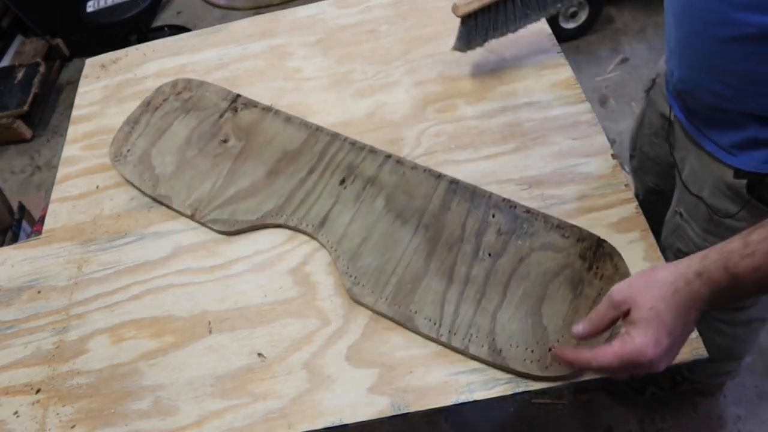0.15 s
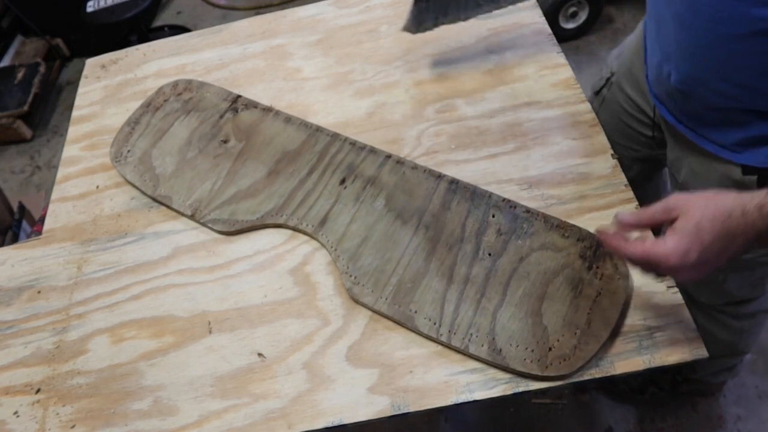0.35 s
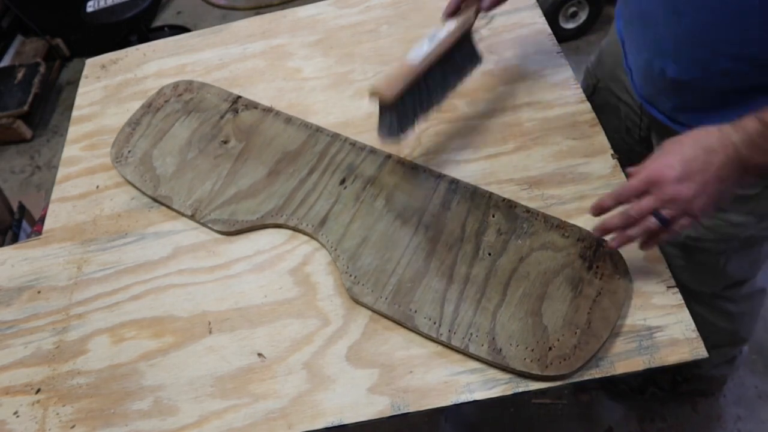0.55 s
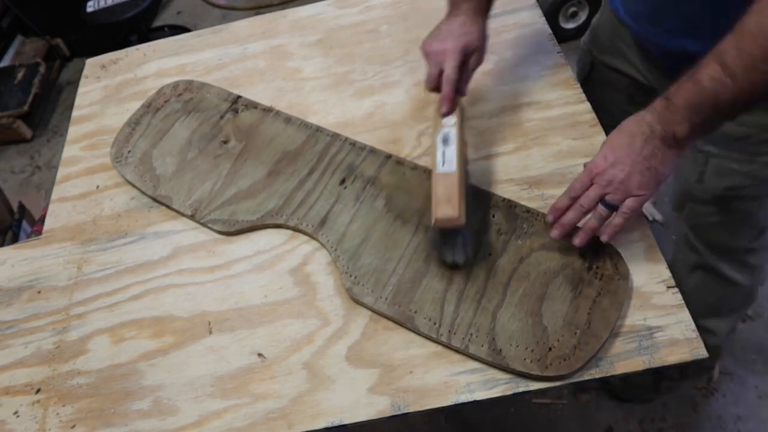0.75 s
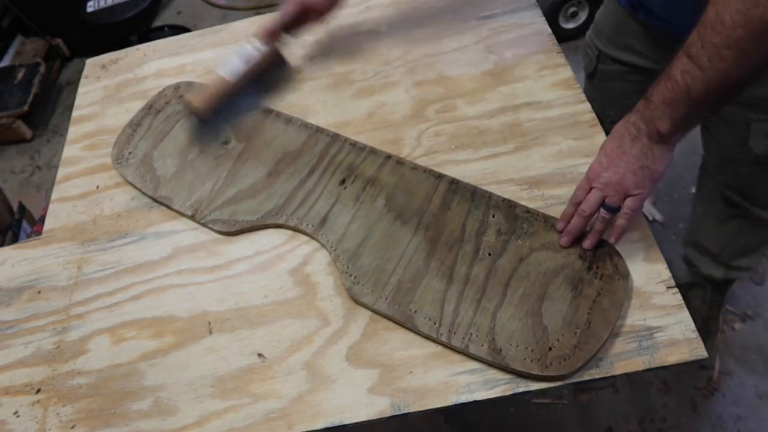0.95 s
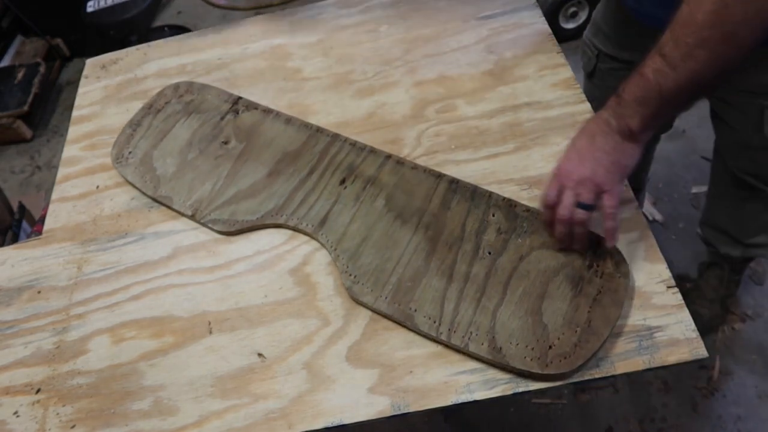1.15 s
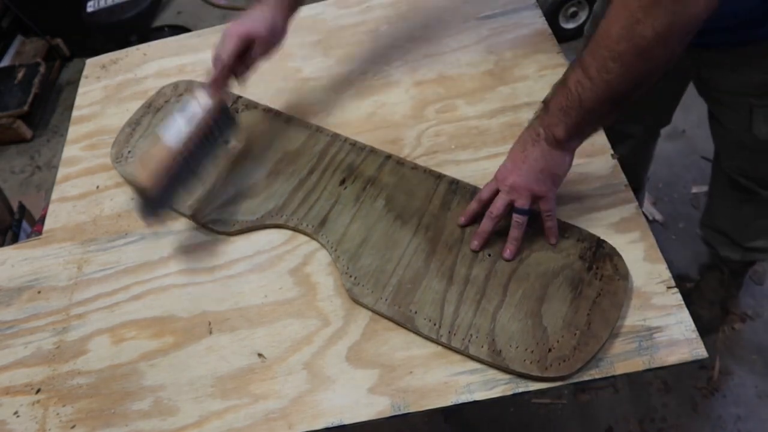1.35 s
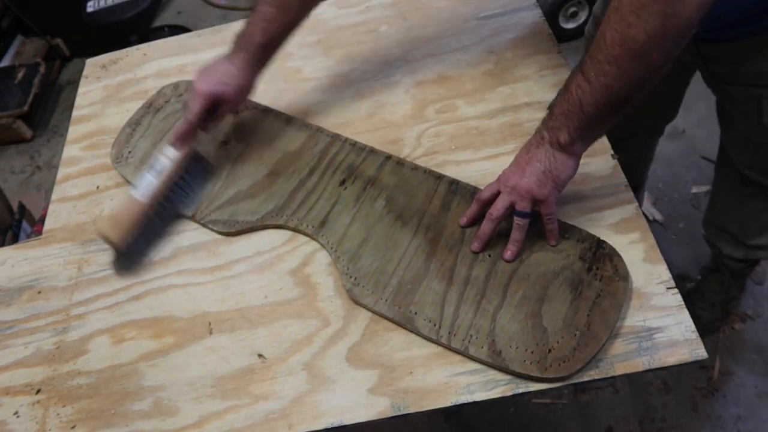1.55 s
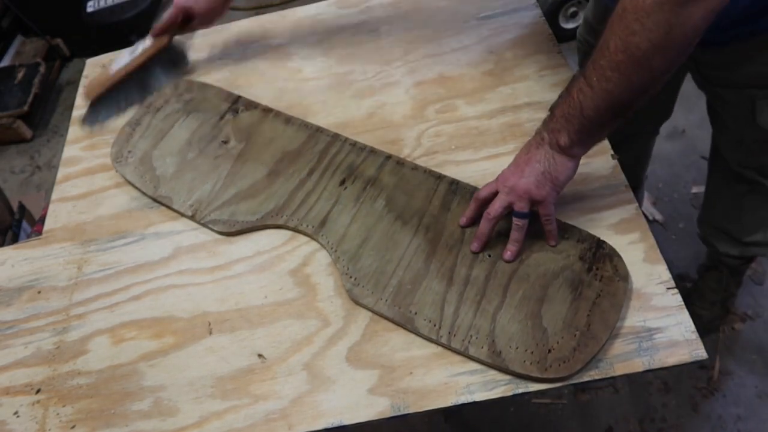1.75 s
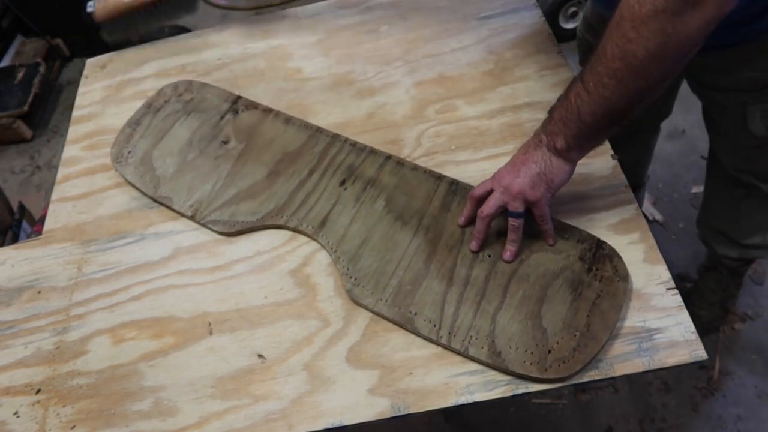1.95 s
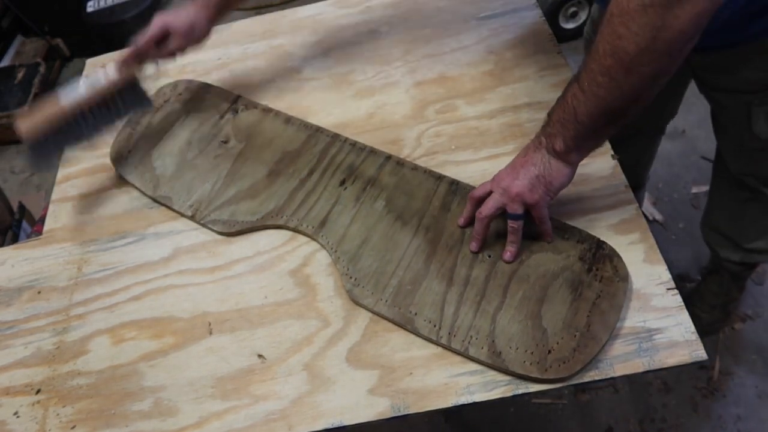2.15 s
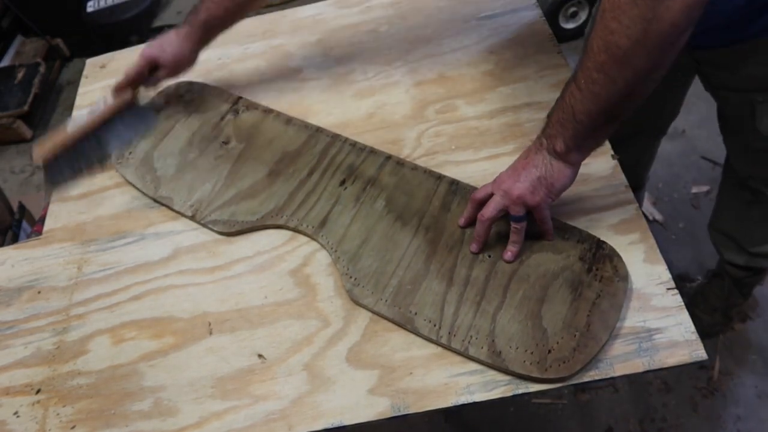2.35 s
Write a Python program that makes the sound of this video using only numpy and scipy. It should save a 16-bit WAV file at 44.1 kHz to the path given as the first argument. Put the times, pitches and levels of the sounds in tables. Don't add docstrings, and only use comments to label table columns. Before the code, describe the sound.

A stiff brush sweeps a plywood board on a wooden bench. First, at 0.2-0.5 s, the board lands with hollow knocks, a sharp crack and trembling rattle. A short bristly stroke follows at 0.6-0.75 s, then longer swishes at 0.9-1.3 and 1.7-2.1 s, with bright grit clicks near 1 s and dull wood knocks between. Close microphone, short garage reflections, faint air, hum and distant machine whirr.

```python
import sys
import numpy as np
from scipy import signal
from scipy.fft import rfft, irfft, next_fast_len
from scipy.io import wavfile
from scipy.ndimage import uniform_filter1d, map_coordinates

SR = 44100
rng = np.random.default_rng(int(sys.argv[2]) if len(sys.argv) > 2 else 0)


def generate_wav(sig):
    pcm = np.round(np.clip(np.atleast_2d(sig).T, -1, 1) * 32767).astype(np.int16)
    wavfile.write(sys.argv[1], SR, pcm)


def amplitude_ratio(level_db):
    exponent = np.asarray(level_db, float) / 20
    return 10 ** exponent


N = 105840

# f/Hz, level/dB per Hz
AIR_SPECTRUM = [(50, -4), (285, -16), (1100, -27), (2200, -30), (5200, -34.5), (8000, -38.5), (12500, -37),
                (16400, -59)]
# t/s, level/dB
AIR_LEVEL = [(0, -43.5), (.1, -50.5), (.26, -50.5), (.29, -55), (.4, -47.5), (1.6, -49.5), (2.19, -50.5),
             (2.22, -58.5), (2.26, -53), (2.4, -54.5)]
AIR_OVER_DB, HUM_HZ, HUM_WIDTH_HZ, HUM_DB = 9.5, 195, 30, -47
# f/Hz, width/Hz, level/dB
FAR_BANDS = [(770, 164, 0), (1440, 270, -1), (1950, 330, -2), (3620, 510, -6.5), (4700, 360, -6)]
# t/s, level/dB
FAR_LEVEL = [(0, -39), (.06, -42.5), (.2, -47), (.5, -54), (1.35, -59), (1.45, -50.5), (1.6, -48.5),
             (1.7, -42), (2.1, -62), (2.4, -74)]
# f/Hz, t60/s
GARAGE_DECAY = [(150, .12), (2000, .25), (12000, .12)]
GARAGE_DB = -14
# f/Hz, level/dB
SIDE_COLOUR = [(60, -45), (350, -35), (1400, -33), (2800, -36), (5500, -29.5), (10000, -26)]
DUCK_OVER_DB, DUCK_SHARE, DUCK_S = -8, 0.89, 0.018
# t/s, length/s, f/Hz, level/dB
SQUEAKS = [
    (.165, .085, 850, -33),
    (.02, .14, 12050, -60),
    (.06, .09, 10750, -59),
    (.02, .14, 13600, -66),
    (.33, .07, 11700, -60),
    (1.57, .045, 13600, -64),
]
SQUEAK_SAG, SQUEAK_ROUGH_DB = .025, 3
# t/s, peak level/dB, f/Hz
GRIT = [(0.614, -24, 9000), (0.829, -16, 10540), (0.8765, -21, 8800), (0.8987, -10.5, 8000),
        (0.9155, -9, 7000), (0.9363, 0, 10100), (0.9385, -19, 9800), (0.9505, 0.5, 10800),
        (0.958, -7, 9800), (0.963, -14, 10000), (0.9715, -1, 10000), (0.9745, -5, 10100),
        (0.978, -12, 10500), (0.9845, 5, 10200), (0.9865, 6, 10200), (0.9878, 2, 9900), (0.989, -4, 9700),
        (0.9942, -5, 10500), (1.3455, -25, 10700), (1.3593, -20, 8200), (1.3773, -27, 10780),
        (1.3955, -38, 9500), (1.4158, -14, 10800), (1.4856, -13, 8680), (1.501, -30, 10200),
        (1.525, -25, 6900), (1.534, -26, 9550), (1.56, -24, 9300), (1.5734, -33, 10000),
        (1.5918, -25, 9400), (1.6107, -30, 9550), (1.6524, -5, 8500), (1.875, -7, 7000), (2.197, -38, 6580),
        (2.2025, -34, 5500), (2.2027, -38, 9500), (2.2695, -30, 9400), (2.3245, -41, 4500),
        (2.3325, -42, 4040), (2.359, -38, 4530), (2.376, -40, 5500), (2.386, -40, 3500)]
# t/s, peak level/dB, f/Hz, t60/s
CRACKS = [(.2634, 3.5, 1760, 0.011), (.2637, -12, 4000, 0.006), (.3657, -17.5, 1690, 0.056),
          (.2535, -8.5, 1270, 0.017), (.3655, -11.5, 4670, 0.0056), (.417, -26, 3650, 0.12),
          (0.81, -13, 3600, 0.0033), (0.62, -15, 5500, 0.0046), (.9685, -8.5, 840, 0.032),
          (.9683, -10, 2150, 0.041), (.9695, -14, 4300, 0.023), (1.2172, -4, 3980, 0.025),
          (1.2175, -12.5, 1500, 0.051), (1.3593, -26, 2500, .005), (1.423, -20.5, 3300, 0.0093),
          (1.4228, -19, 1770, 0.011), (1.395, -29, 900, 0.017), (1.524, -45, 900, 0.021),
          (1.6539, -10, 2920, 0.02), (1.6535, -15.5, 1480, 0.021), (1.653, -15.5, 5600, 0.015),
          (2.2694, -25.5, 2150, 0.0062), (2.2696, -33, 3900, 0.004), (2.2025, -27, 2000, 0.0072)]
CRACK_WIDTH, GRIT_WIDTH = .45, .7
GRIT_T60 = .0035
SNAP_DB, SNAP_T60 = -3, .002
MIC_HZ = 13500
# f/Hz, level/dB
BOARD_MODES = [(62, -14), (100, -2), (168, -5), (255, -4.5), (355, 1), (500, -4), (640, -4.5), (830, -4.5),
               (1070, -9.5), (1500, -12.5)]
# t/s, level/dB
TREMBLE_LEVEL = [(0.0, -45), (0.16, -44.5), (0.27, -24), (0.39, -22), (0.47, -37), (0.58, -39), (0.75, -42),
                 (0.84, -40), (1.02, -49), (1.28, -39.5), (1.43, -44), (1.61, -52), (1.68, -28.5),
                 (2.03, -33.5), (2.19, -44.5), (2.4, -42.5)]
TREMBLE_DB, TREMBLE_WIDTH, TREMBLE_TILT_DB = -3, 0.22, -3.5
TREMBLE_LOW_HZ, TREMBLE_TOP_HZ = 86, 690
# t/s, peak level/dB, hardness/dB, bench depth/dB
BLOWS = [(0.2274, -6, 0, -8), (0.251, -18.5, 6, -9), (0.259, -9.5, 2.5, -1), (0.272, -15, -0.5, -8),
         (0.34, -10, -5.5, 0), (0.363, -10.5, -6.5, 2), (0.389, -23, 4.5, 2), (0.476, -12.5, -6, 1),
         (0.651, -14.5, -23, -38), (0.759, -19.5, -19, -0.5), (0.815, -21.5, -32, -6),
         (0.921, -26.5, -5, 14), (0.945, -19, -16, 5.5), (0.968, -38, 12, -3), (1.21, -13.5, -5, -7.5),
         (1.25, -13.5, -4, -21), (1.293, -24.5, -23, 9), (1.3925, -13, -9, -5.5), (1.417, -20, -20, -12),
         (1.529, -14.5, -10, -4), (1.552, -27, -21, 5), (1.648, -7, -16, -12), (1.685, -19, -14, -2.5),
         (1.722, -20, -9, -8), (1.944, -20.5, -4, -6), (2.012, -12.5, -4, 5.5), (2.074, -24, -9, 6),
         (2.108, -17, -15, 5), (2.146, -22.5, -13, -2.5), (2.385, -30.5, -10, 0)]
BOARD_T60, FASTER, LAG_S = 0.22, 0.62, 0.003007
THUD_HZ, THUD_DB, THUD_T60 = 144.6, 5, 0.044
# f/Hz, level/dB
RATTLE_COLOUR = [(25, -30), (100, 5), (170, -0.5), (350, -4), (900, -8.5), (2000, -22), (4000, -28),
                 (9000, -78)]
RATTLE_DB, RATTLE_T60 = -16.5, 0.4
# t/s, level/dB, tips over drag/dB, shafts over drag/dB
STROKES = [
    [(.13, -49, -4, -25), (.19, -38.5, -4, -3), (.232, -35.5, -3, -14), (.245, -66, -12, -7)],
    [(.41, -41, -5, -1), (.42, -44, 9, 6), (.47, -42.5, 1, 3), (.57, -62, 8, 11)],
    [(.605, -51, 11, 3), (.62, -32.5, 9.5, -4), (.67, -27, 6.5, 5.5), (.72, -38, -4.5, 0.5),
     (.86, -50, 2, -3)],
    [(.87, -43.5, -3, -9), (.905, -29.5, -1.5, -6), (.975, -26.5, 10.5, 0.5), (1.003, -28, 4.5, -8),
     (1.05, -20, 2.5, 1.5), (1.16, -20.5, 10, 8), (1.21, -24, 6.5, 3), (1.27, -33, -5.5, -4),
     (1.34, -48, -7, 3)],
    [(1.665, -47.5, -19, -14), (1.71, -26, 2.5, 11), (1.755, -24.5, 3, 4.5), (1.83, -23.5, 4.5, 1.5),
     (1.88, -22.5, 5.5, 4.5), (1.975, -24.5, -6.5, -1.5), (2.09, -34, -2, 5), (2.125, -51, 3, 0),
     (2.21, -62, -7, 2)],
]
# f/Hz, level/dB
DRAG_COLOUR = [(200, -23), (900, 0), (1700, 3.5), (2300, 6), (3500, 5.5), (5500, -0.5), (9000, -22)]
# f/Hz, level/dB
SHAFT_COLOUR = [(2000, -60), (4000, -5), (5700, 4.5), (6500, 2.5), (7600, 0.5), (10000, -4.5), (14000, -59)]
# f/Hz, level/dB
TIP_COLOUR = [(4000, -27.5), (7500, -8.5), (9500, -4), (10400, -2.5), (11500, -4), (13500, -14),
              (15600, -33.5)]
SLIPS_PER_S, SLIP_SPREAD_DB = 11000, 2.5
CEILING, KNEE = .68, 5
TOP_HZ, TOP_SLOPE_HZ = 15500, 250


def unit(x):
    return x / np.sqrt(np.mean(x ** 2) + 1e-20)


def along(points, hz):
    f, v = np.transpose(points)
    return np.interp(np.log(hz + 1), np.log(f + 1), v)


def level_at(points):
    s, db = np.transpose(points)
    return amplitude_ratio(np.interp(np.arange(N) / SR, s, db))


def filtered(x, response):
    m = next_fast_len(x.shape[-1] + 4096)
    spectrum = rfft(x, m) * response(np.fft.rfftfreq(m, 1 / SR))
    return irfft(spectrum, m)[..., :x.shape[-1]]


def coloured(x, spectrum):
    return unit(filtered(x, lambda hz: amplitude_ratio(along(spectrum, hz))))


def wobble(rate):
    knots = rng.standard_normal(int(N * rate / SR) + 4)
    return map_coordinates(knots, [np.arange(N) * rate / SR])


def patchy(x, patchy_db):
    z = signal.stft(x, nperseg=256)[2]
    field = uniform_filter1d(rng.standard_normal(z.shape), size=5, axis=0)
    field = uniform_filter1d(field, size=9, axis=1)
    return signal.istft(z * amplitude_ratio(patchy_db * unit(field)), nperseg=256)[1][:N]


def add(track, s, sound):
    part = track[round(s * SR):][:len(sound)]
    part += sound[:len(part)]


def air():
    hiss = coloured(rng.standard_normal(N), AIR_SPECTRUM) * level_at(AIR_LEVEL) * amplitude_ratio(AIR_OVER_DB)
    hum = filtered(rng.standard_normal(N), lambda hz: np.exp(-((hz - HUM_HZ) / HUM_WIDTH_HZ) ** 2))
    return hiss + amplitude_ratio(HUM_DB) * unit(hum)


def far_machine():
    def bands(f):
        return sum(amplitude_ratio(db) * np.exp(-((f - centre) / width) ** 2) for centre, width, db in FAR_BANDS)

    return unit(filtered(rng.standard_normal(N), bands)) * level_at(FAR_LEVEL)


def garage(x):
    hz, t, z = signal.stft(rng.standard_normal(SR // 2), SR, nperseg=256)
    decay = amplitude_ratio(-60 * t / along(GARAGE_DECAY, hz)[:, None])
    tail = signal.istft(z * decay, SR, nperseg=256)[1]
    delayed = np.pad(x, (300, 0))
    return signal.fftconvolve(delayed, tail / np.linalg.norm(tail))[:N]


def ducked(near):
    size = round(DUCK_S * SR)
    power = uniform_filter1d(near ** 2, size=size, origin=size // 2 - 1)
    level_db = 10 * np.log10(abs(power) + 1e-9)
    return amplitude_ratio(-DUCK_SHARE * np.maximum(level_db - DUCK_OVER_DB, 0))


def squeaks():
    out = np.zeros(N)
    for s, length, hz, db in SQUEAKS:
        u = np.linspace(0, 1, round(length * SR))
        pitch = hz * (1 - SQUEAK_SAG * u * np.sign(1 - s)) + 60 * wobble(287)[:len(u)]
        tone = np.sin(2 * np.pi * np.cumsum(pitch) / SR)
        swell = np.sin(np.pi * u) ** 0.18
        add(out, s, amplitude_ratio(db + SQUEAK_ROUGH_DB * wobble(340)[:len(u)]) * swell * tone)
    return out


def ticks(events, width):
    out, t = np.zeros(N), np.arange(SR // 20) / SR
    for s, db, hz, t60 in events:
        def band(f):
            damping = 1j * f * width * hz
            return (damping / (hz * hz - f * f + damping)) ** 2

        click = unit(filtered(rng.standard_normal(len(t)), band)) + 0.73 * np.sin(2 * np.pi * hz * t)
        snap = np.diff(rng.standard_normal(len(t) + 1)) / 2 ** .5
        add(out, s, amplitude_ratio(db - 9.0 + SNAP_DB - 60 * t / SNAP_T60) * snap)
        add(out, s, amplitude_ratio(db - 5.5 - 60 * t / t60) * click * (1 - np.exp(-t * hz / 2)))
    return filtered(out, lambda f: 1 / (1 + (f / MIC_HZ) ** 12))


def cracks():
    return ticks(CRACKS, CRACK_WIDTH)


def grit():
    return ticks([(*row, GRIT_T60) for row in GRIT], GRIT_WIDTH)


def tremble():
    def body(f):
        total = 0
        for k, (centre, _) in enumerate(BOARD_MODES):
            damping = 1j * f * TREMBLE_WIDTH * centre
            tilt = amplitude_ratio(TREMBLE_TILT_DB * np.log2(centre / 100))
            total = total + (-1) ** k * tilt * damping / (centre * centre - f * f + damping)
        return total * f ** 2 / (f ** 2 + TREMBLE_LOW_HZ ** 2) / (1 + (f / TREMBLE_TOP_HZ) ** 4)

    pushes = rng.standard_normal(N) * amplitude_ratio(3.7 * wobble(29.8))
    return unit(filtered(pushes, body)) * level_at(TREMBLE_LEVEL) * amplitude_ratio(TREMBLE_DB)


def boards():
    out, t = np.zeros(N), np.arange(SR // 2) / SR
    hz, level_db = np.array(BOARD_MODES).T[:, :, None]
    t60 = BOARD_T60 * (hz / 100) ** -FASTER
    for s, db, hard_db, deep_db in BLOWS:
        chance = rng.standard_normal((len(BOARD_MODES), 2))
        struck_db = level_db + hard_db * (hz > 300) + deep_db * (hz < 120) + 2 * chance[:, :1]
        modes = np.sin(2 * np.pi * hz * (1 + chance[:, 1:] / 40) * t)
        ring = (amplitude_ratio(struck_db - 60 * t / t60) * modes).sum(0)
        ring += amplitude_ratio(THUD_DB - 60 * t / THUD_T60) * np.sin(2 * np.pi * THUD_HZ * t)
        ring *= 1 - np.exp(-t / 0.0019)
        rattle = coloured(rng.standard_normal(len(t)), RATTLE_COLOUR) * amplitude_ratio(RATTLE_DB - 60 * t / RATTLE_T60)
        rattle *= 1 - np.exp(-t / 0.0018)
        add(out, s + LAG_S, amplitude_ratio(db - 5.0) * (rattle - ring))
    return out


def brush():
    t, out = np.arange(N) / SR, np.zeros(N)
    layers = []
    for colour in (DRAG_COLOUR, TIP_COLOUR, SHAFT_COLOUR):
        chance = rng.random((3, N))
        slipping = chance[0] < SLIPS_PER_S / SR
        size = amplitude_ratio(-SLIP_SPREAD_DB * np.log(chance[2] + 1 / 300))
        slips = slipping * np.sign(chance[1] - .5) * size
        layers.append(coloured(patchy(slips, patchy_db=2.0), colour) * amplitude_ratio(1.28 * wobble(34.38)))
    for rows in STROKES:
        s, level_db, tips_db, shafts_db = np.transpose(rows)
        shares = amplitude_ratio([0 * t, np.interp(t, s, tips_db), np.interp(t, s, shafts_db)])
        mix = (shares * layers).sum(0) / np.sqrt((shares ** 2).sum(0))
        out += amplitude_ratio(np.interp(t, s, level_db, left=-120, right=-120)) * mix
    return out


def scene():
    near = squeaks() + grit() + cracks() + tremble() + boards() + brush()
    background = ducked(near) * (air() + far_machine())
    mid = near + amplitude_ratio(GARAGE_DB) * garage(near) + background
    smear = rng.standard_normal(128)
    smeared = np.convolve(mid, smear / np.linalg.norm(smear))[:N]
    side = filtered(smeared, lambda hz: amplitude_ratio(along(SIDE_COLOUR, hz)))
    return np.array([mid + side, mid - side])


def top_cut(x):
    return signal.sosfilt(signal.butter(12, 16470, fs=SR, output="sos"), x)


def record(dry):
    def band(hz):
        return np.exp(-np.maximum(hz - TOP_HZ, 0) / TOP_SLOPE_HZ) * hz ** 2 / (hz ** 2 + 900)

    limited = dry / (1 + np.abs(dry / CEILING) ** KNEE) ** (1 / KNEE)
    return top_cut(filtered(limited, band))


dry = scene()
out = record(dry)
generate_wav(out)
```